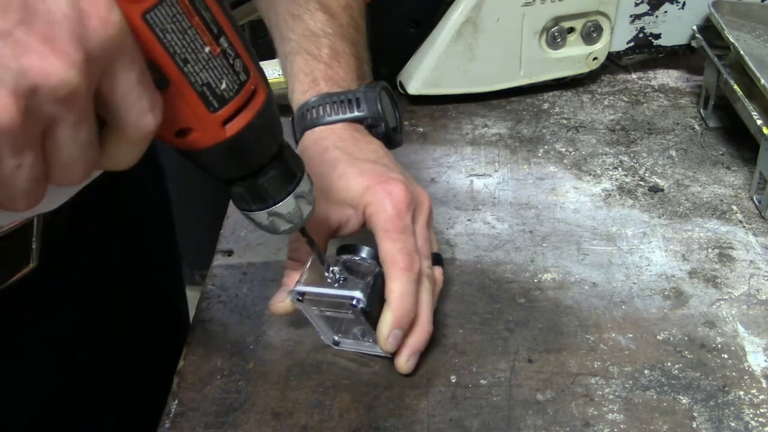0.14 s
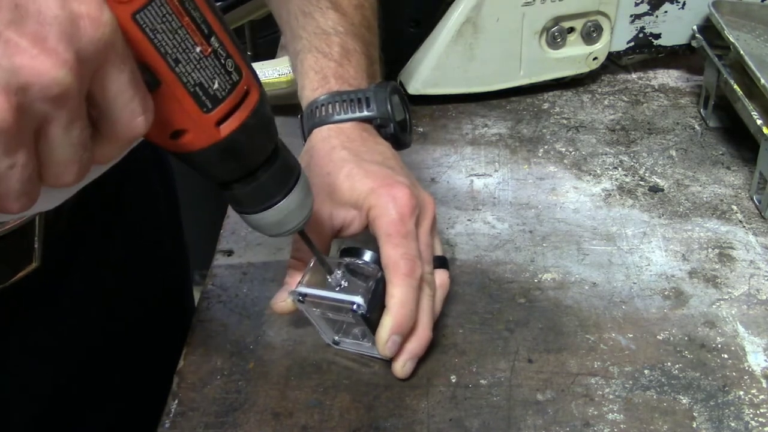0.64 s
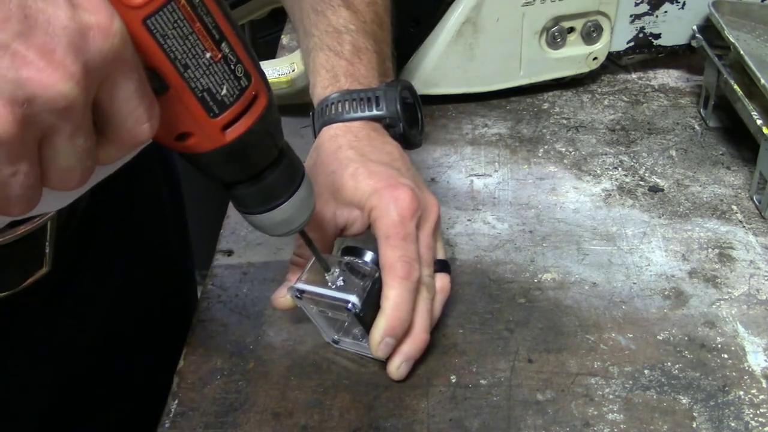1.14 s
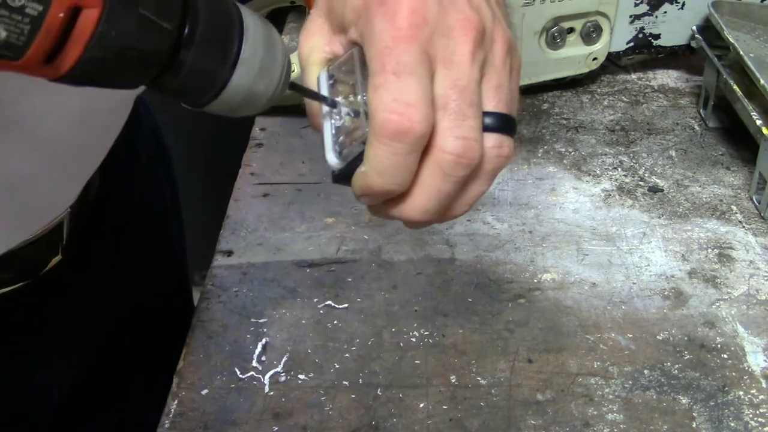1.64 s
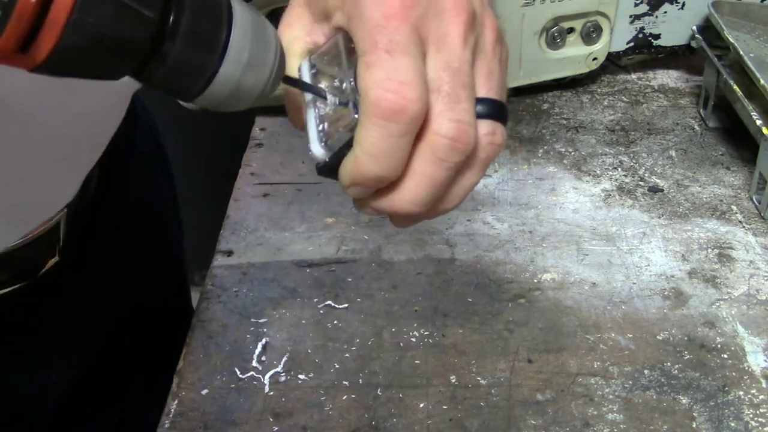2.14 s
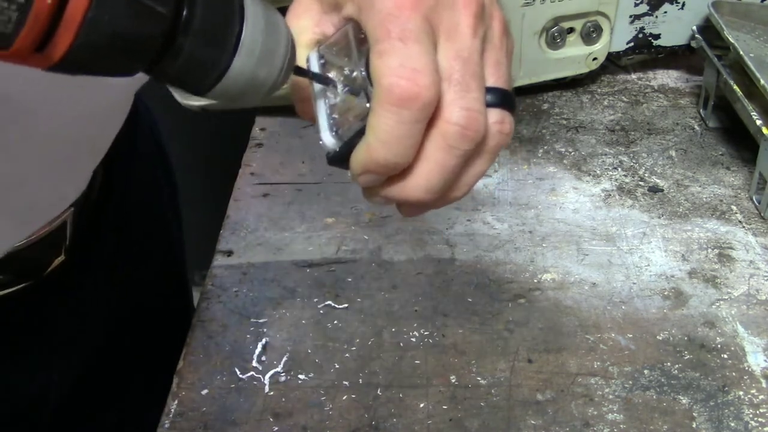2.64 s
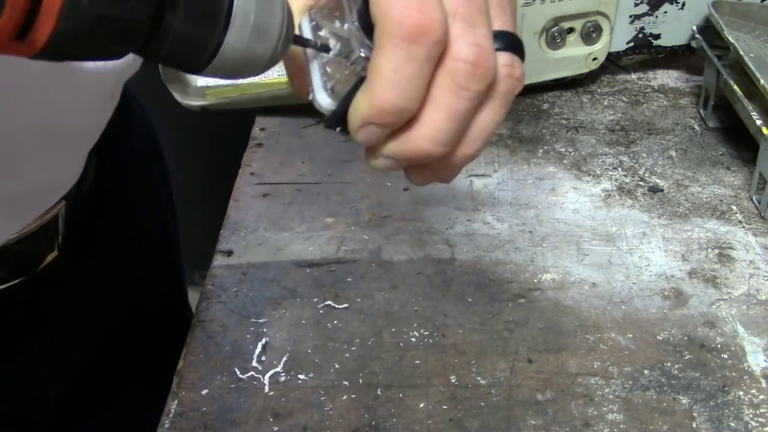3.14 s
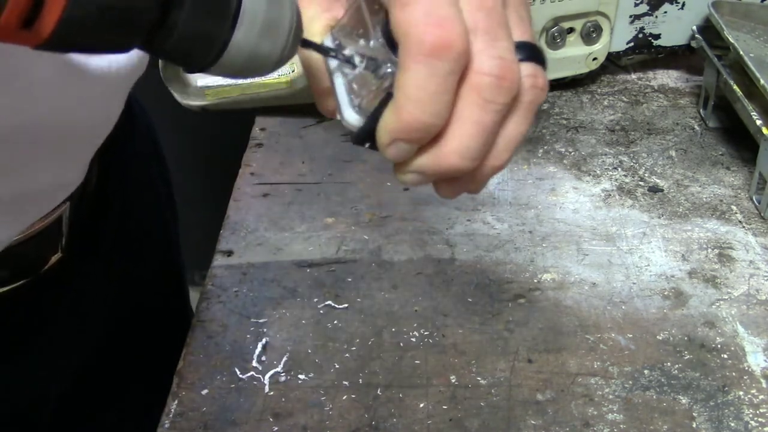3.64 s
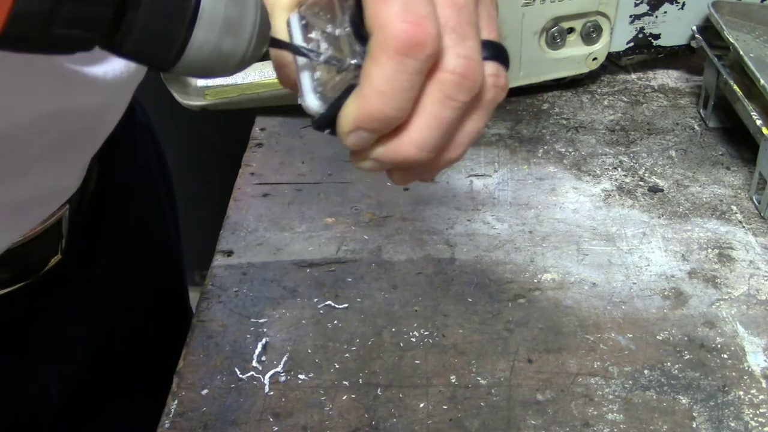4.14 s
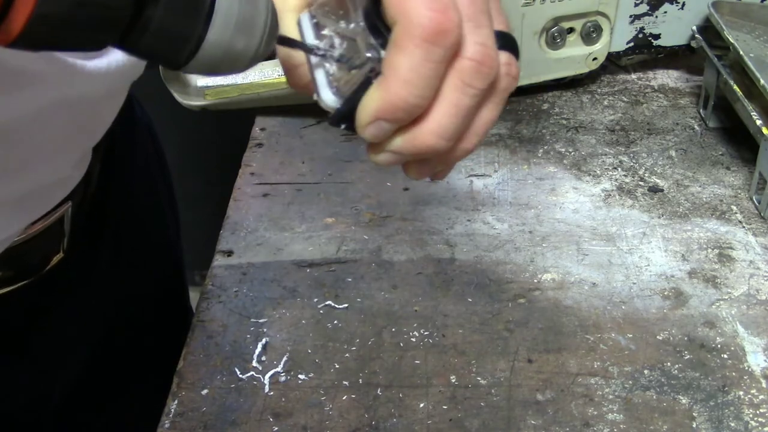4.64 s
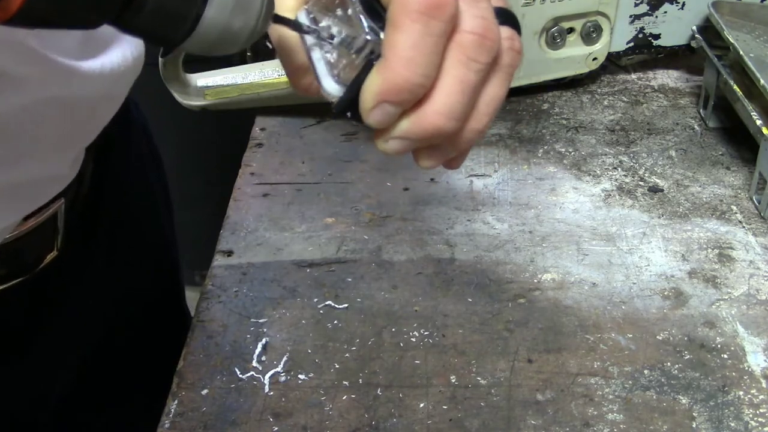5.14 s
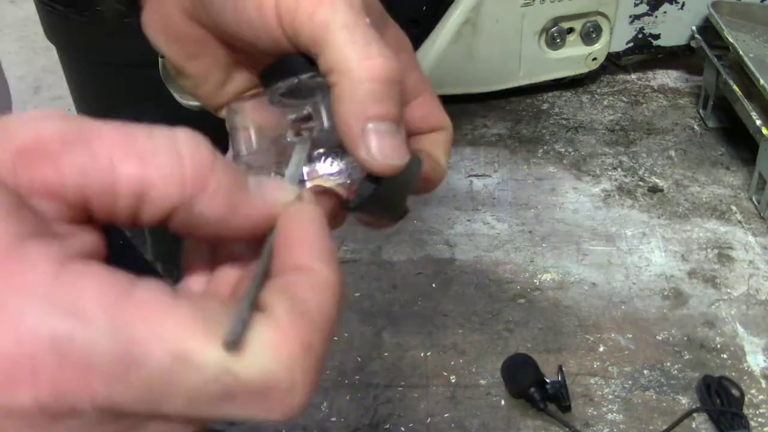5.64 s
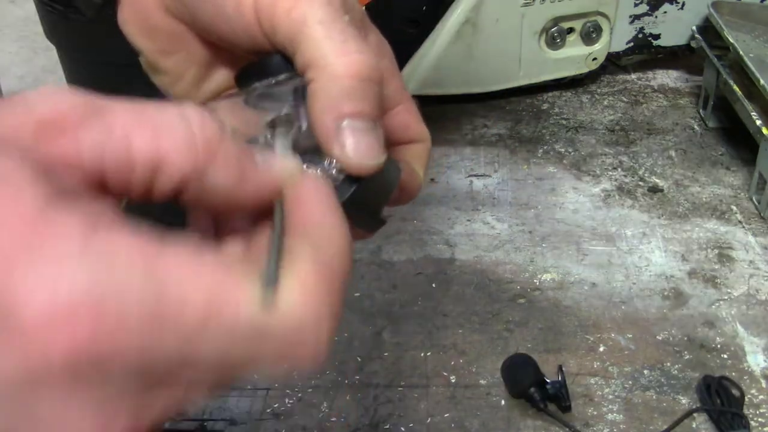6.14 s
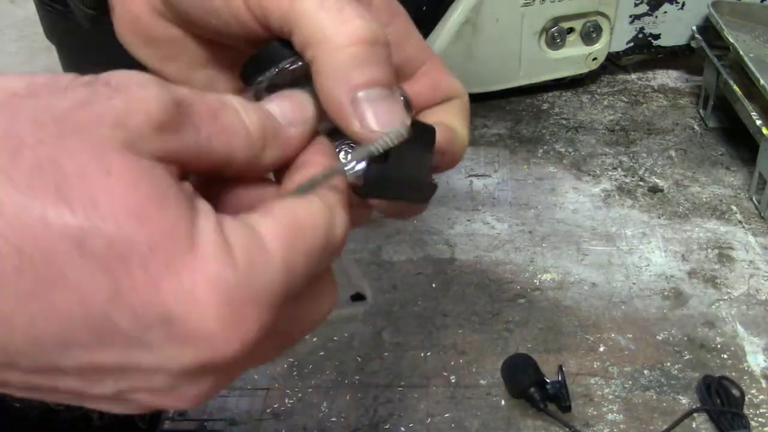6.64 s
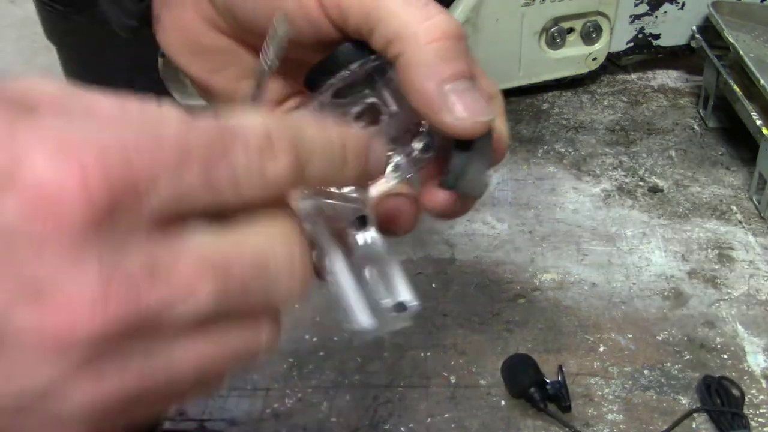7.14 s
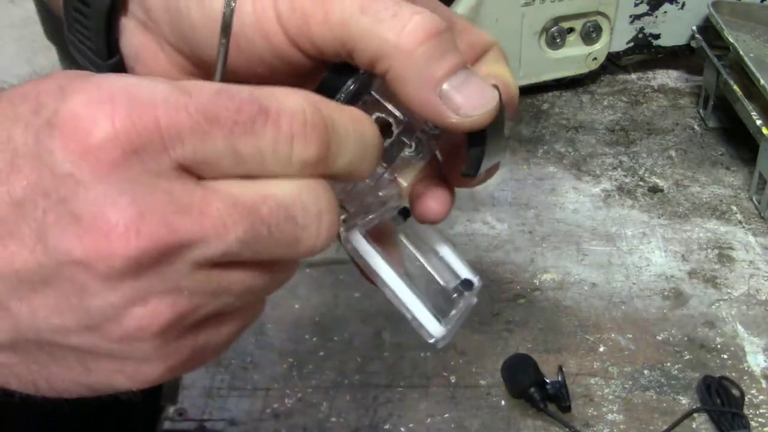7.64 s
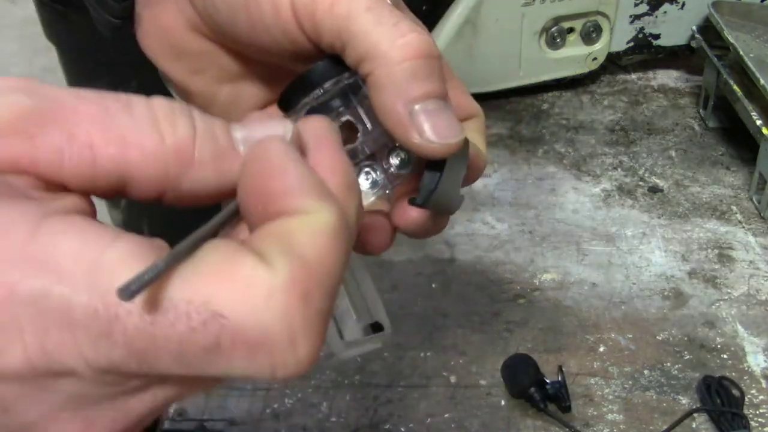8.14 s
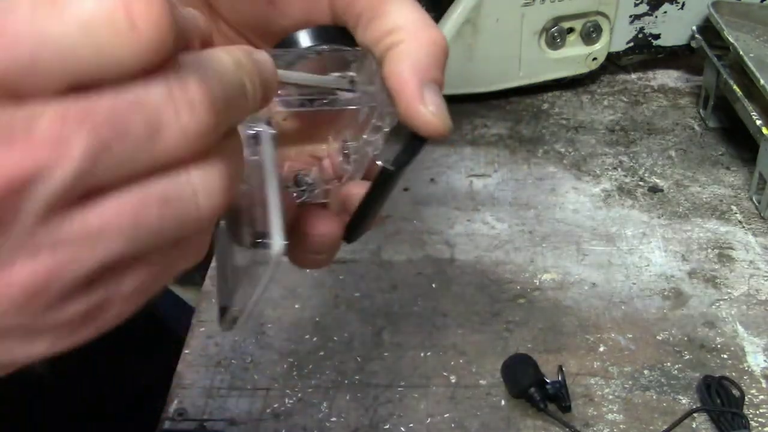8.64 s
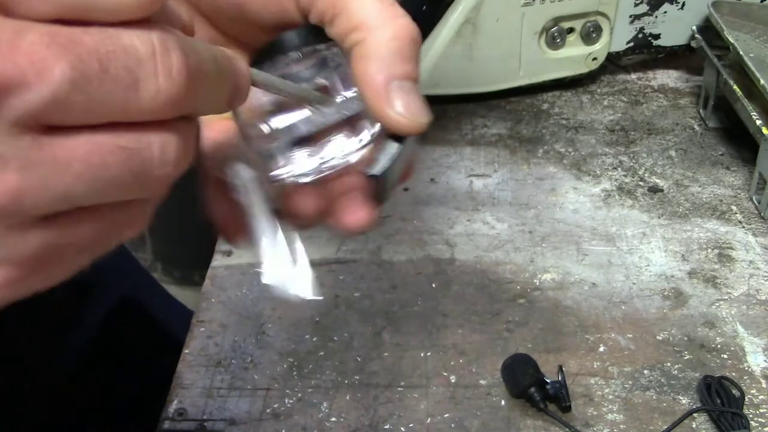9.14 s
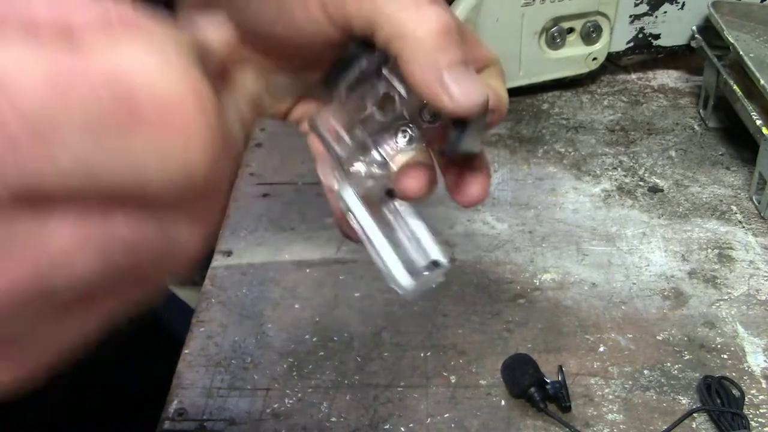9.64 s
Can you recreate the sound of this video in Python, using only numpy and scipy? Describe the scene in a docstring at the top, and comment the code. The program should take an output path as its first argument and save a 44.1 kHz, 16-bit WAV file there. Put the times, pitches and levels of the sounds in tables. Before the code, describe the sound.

Quiet fan rumble, faint mains hum and a dying whir open the scene; a tiny trigger snap comes just before 0.2 s. The drill lurches with a boomy growl and by 0.4 s holds a gear whine near 970 Hz inside a loud, gritty, throbbing roar with chatter, close and slightly left. At 1.34 s a hard cut shifts it to about 840 Hz, wider and more uneven; pitch wavers, the bit binds and chatters, and soft low thuds fall around 2.3-3.3 s. At 5.5 s it cuts off dead. Centred, a file then scrapes a hollow plastic case: clicks and short rasps to 6.2 s with a bright squeak, sparse taps around 6.6-6.9 and 7.2-7.7 s, sharper knocks at 8.1-8.2 s, then increasingly dense strokes from 8.3 s, fullest and hollowest at 9.2-9.5 s, with squeaks, a dull knock and a last tap at 9.7 s. Short concrete-room reverberation.

```python
"""Drilling and filing a plastic case

In a concrete workshop a cordless drill bores a hard plastic case, first on a bench, then up in the hand.
Its gear tones, throbbing noise and chatter come from a little left of centre in the stereo microphones.
After a hard edit a round file rasps, taps and squeaks in the middle: short bursts of noise ring the hollow
case near 1.7 kHz. The room answers the filing some 7 ms later, over fan noise and mains hum."""
import sys
import numpy as np
from scipy import signal
from scipy.fft import rfft, irfft, next_fast_len
from scipy.io import wavfile
from scipy.ndimage import uniform_filter1d, map_coordinates

SR = 44100
rng = np.random.default_rng(int(sys.argv[2]) if len(sys.argv) > 2 else 0)


def transcribe(signal):
    """Save signal, clipped to [-1, 1], as a 16-bit WAV file at the path in sys.argv[1]."""
    frames = np.atleast_2d(signal).T
    limited = np.clip(frames, -1, 1)
    pcm = np.round(limited * 32767).astype(np.int16)
    wavfile.write(sys.argv[1], SR, pcm)


def rack_gain(trim_db):
    """Turn a fader trim in dB into the linear factor to multiply a signal by."""
    fader = np.asarray(trim_db, float)
    return 10 ** (fader / 20)


N = 429975
T = np.arange(N) / SR  # time, s

# spectrum shape of the workshop air: f/Hz, density/dB per Hz
AIR = [(12, -79), (20, -34), (86, -13.5), (116, -5), (204, -14), (248, -9), (377, -12.5), (410, -15),
       (485, -14), (698, -18.5), (949, -21.5), (1120, -20), (16000, -41)]
AIR_DB = -53.5
# side under mid of the air: f/Hz, level/dB
AIR_WIDTH = [(60, -18.5), (400, -9.5), (4000, -8.5), (9000, -15)]
# mean level of each mains hum line: f/Hz, level/dB
HUM = [(120, -62), (238, -67), (480, -63), (598, -68), (958, -66.5), (1200, -70)]
# decay of the workshop's reverberation: f/Hz, t60/s
SHOP = [(500, 0.44), (1600, 0.78), (4000, 0.49), (10000, 0.31)]
# microphone pair, side under mid before each source's own offset: f/Hz, level/dB
WIDTH = [(100, -27), (350, -36), (700, -30), (1500, -26.5), (2400, -22), (3300, -23), (5500, -15),
         (15000, -13.5)]
# microphone pair, left over right for the drill: f/Hz, level/dB
LEAN = [(200, .15), (600, .4), (2400, .5), (15000, 1.1)]

# the case knocks dully against the palm: t/s, f/Hz, level/dB where the decay starts
KNOCKS = [(6.212, 620, -29), (6.686, 775, -25), (9.449, 760, -26), (9.537, 820, -17)]
KNOCK_T60_S = 0.022
# the file skids and squeaks: t/s, length/s, from f/Hz, to f/Hz, level/dB
SQUEAKS = [(6.072, 0.031, 1046, 1080, -30.5), (6.143, 0.015, 2063, 1866, -9.5),
           (6.169, 0.028, 1322, 1450, -25), (8.772, 0.016, 1480, 1340, -32.5),
           (8.847, 0.047, 1050, 1360, -28), (9.032, 0.025, 1655, 1750, -14), (9.074, 0.011, 886, 1050, -25),
           (9.526, 0.017, 4250, 3946, -16.5)]
# cavity resonances before damping: multiple of the cavity note, width/Hz, level/dB (response is squared)
CAVITY = [(.86, 320, -8), (1, 320, 0), (1.13, 320, -8)]
# shell resonances, before the closed hand narrows and mutes them: f/Hz, width/Hz, level/dB
SHELL = [(3880, 450, -1), (5310, 290, 7.5), (6100, 400, -7), (7620, 340, -0.5), (9000, 740, -3.5),
         (11620, 600, -3), (4800, 3700, -7)]
# wall resonances: f/Hz, width/Hz, level/dB
WALL = [(860, 250, -4.5), (1050, 83, 3.5), (1370, 110, 7.5), (2500, 260, -3), (3340, 500, -3.5)]
# fingers cover more or less of the opening and move the cavity note: t/s, f/Hz
OPENING = [(5.66, 1810), (6.2, 1875), (6.65, 1610), (6.8, 1740), (7.4, 1750), (7.65, 1676), (8.08, 1800),
           (8.2, 1700), (8.5, 1697), (9.72, 1706)]
NOTE_SCATTER = .008  # share by which each touch scatters the cavity note
# taps and snags of the file: t/s, cavity ring energy/dB, rasp over cavity/dB
TAPS = [(5.664, -18, -16.5), (5.84, -23, -7), (5.851, -8.5, -2.5), (5.9073, -20, -7), (5.9174, -5, -19),
        (5.9579, -27, -3), (6.156, 13.5, -16), (6.59, -23, -9), (6.6847, -14.5, -4), (6.796, -20, -12.5),
        (6.806, -7, -6), (6.863, -15, -21), (7.211, -16, -12.5), (7.419, -16, -11), (7.545, -30, -14),
        (7.614, -31, -12), (7.6464, -0.5, -4), (7.654, -2.5, -3), (7.67, -9, -10), (8.078, -2, -9.5),
        (8.0945, -9, -17), (8.101, 10.5, -13.5), (8.122, -4, -18), (8.1427, -19, -17), (8.194, 12, -22),
        (8.404, 3, -1.5), (8.4486, 2.5, -22), (8.819, 8.5, -6), (8.936, 13.5, -10), (9.1132, -3, -8),
        (9.3583, 5, -15), (9.405, 8, -10), (9.517, 0, -7), (9.538, 4.5, -8.5), (9.716, -7.5, -0.5)]
TAP_WALL_DB = -9.5  # walls over the cavity in a tap
# file strokes: t/s, length/s, swell from start to end/dB, cavity level/dB, rasp level/dB
STROKES = [(5.859, 0.0052, -6, -39, -39), (5.979, 0.077, 9, -27.5, -28), (6.067, 0.054, 1.5, -26.5, -31),
           (6.124, 0.024, 0, -25.5, -24.5), (6.171, 0.044, 13, -21, -21), (6.602, .022, 3, -50, -56),
           (6.628, 0.012, 0, -42, -43.5), (6.653, .016, 0, -54, -53), (6.677, 0.013, 3, -48, -36.5),
           (7.32, 0.021, -3, -37, -46.5), (7.647, 0.034, -25, -22.5, -39), (8.188, 0.0207, 6.5, -21, -31.5),
           (8.209, 0.021, -17, -23, -28.5), (8.327, 0.032, -14, -30, -34.5), (8.391, 0.038, -1, -26, -28),
           (8.453, 0.023, -22, -34, -31.5), (8.514, 0.022, 10, -39, -38), (8.659, 0.045, -5, -32, -24),
           (8.744, 0.045, -15, -32.5, -33.5), (8.797, 0.019, 11, -24, -21.5), (8.855, 0.026, 5, -30, -29.5),
           (8.899, 0.042, 3, -23.5, -24.5), (8.961, 0.04, -5.5, -29.5, -31),
           (9.015, 0.032, 0.5, -21, -23.5), (9.066, 0.038, -4, -26, -32.5), (9.12, 0.032, 14, -23.5, -29.5),
           (9.162, 0.029, -1, -37, -42), (9.207, 0.035, -2, -21, -22.5), (9.254, 0.051, 3, -13, -23),
           (9.301, 0.054, -7, -14.5, -18), (9.357, 0.034, -9, -11, -24.5), (9.391, 0.043, -12, -12, -21),
           (9.436, 0.044, -2, -24.5, -32), (9.481, 0.023, 0, -16, -21.5), (9.51, 0.033, -5.5, -16, -19.5),
           (9.528, 0.014, 5.5, -47, -23.5)]
# from CLASP_S on the hand closes on the case during strokes; walls over the rasp before and after
CLASP_S, LOOSE_DB, CLASPED_DB = 9.11, -1.5, -15.5
CLASPED_WIDTH = .85  # factor on shell widths in the closed hand
CLASPED_DULL_DB, DULL_HZ = -6, 6800  # the hand mutes shell modes that reach above DULL_HZ

# motor speed under load, one list per run: t/s, gear-mesh f/Hz, mean mesh tone peak level/dB
RUNS = [
    [(.19, 352.6, -39), (.285, 543, -13), (.294, 650, -17), (.303, 760, -12.5), (.322, 815, -12),
     (.34, 921.5, -21), (.365, 955.4, -21.5), (.41, 975, -21.5), (.9, 976, -20.5), (1.338, 968.4, -23)],
    [(1.342, 831.5, -21.5), (1.6, 838, -23.5), (2.08, 851, -24), (2.2, 836, -25.5), (2.5, 847.5, -25.5),
     (2.75, 860, -23.5), (2.88, 866, -20), (3.18, 886, -20), (3.4, 880.5, -23), (3.53, 856.4, -27.5),
     (3.65, 851, -20.5), (4.02, 862, -20), (4.22, 867.5, -20), (4.48, 826, -20.5), (4.75, 833, -21.5),
     (5.02, 833, -25.5), (5.13, 852.6, -21), (5.3, 850, -21.5), (5.523, 861, -21.5)],
]
# starts of the three grips, first on the bench, then two in the hand: t/s
GRIPS = [0, 1.34, 2.75]
# spectrum shape of the roar, one list per grip: f/Hz, density/dB per Hz
ROAR = [
    [(71, -59), (120, -9.5), (209, -24.5), (321, -4), (513, -17), (911, -9.5), (988, -4), (1430, -10.5),
     (3820, -11), (4230, -12), (8660, -17.5), (11500, -23), (16000, -38)],
    [(71, -75.5), (120, -26.5), (301, -2.5), (348, 3), (418, -4), (839, -4.5), (949, -5), (2340, -5),
     (2700, -7.5), (5630, -14), (11500, -15), (14700, -31.5), (16000, -59.5)],
    [(71, -57.5), (120, -46.5), (196, -23), (341, -5.5), (445, -13), (839, -6.5), (2430, -13),
     (5630, -10.5), (7200, -17.5), (9210, -12), (13300, -27.5), (14700, -34.5), (16000, -85)],
]
# mean roar level from 1.5 to 11 kHz, one per grip: level/dB
ROAR_DB = [-16, -16.5, -16.5]
# resonances of housing and case, one list per grip: f/Hz, width/Hz, boost/dB
HOUSING = [
    [(362, 57, 5), (650, 150, 12), (804, 81, 8.5), (2380, 110, 5), (3150, 180, 3.5), (3690, 340, 9.5),
     (4850, 340, 5), (5490, 390, 4), (8800, 940, 6.5), (9830, 280, 6.5), (11180, 330, 10),
     (13170, 130, 10.5)],
    [(355.9, 240, -7), (1480, 56, 7), (1840, 110, 3), (2324, 110, 3.5), (2675, 99, -13), (3390, 72, -1.5),
     (3790, 100, 4), (4690, 1100, 8.5), (5740, 760, 9), (8300, 160, 5), (11454, 310, -1)],
    [(332, 140, -2.5), (578, 120, 3), (1450, 66, 7.5), (2085, 280, 4), (3016, 220, 9), (3433, 110, 6),
     (3750, 130, 6.5), (4500, 180, 6.5), (5590, 180, 6), (6700, 100, 5.5), (7860, 250, 5), (10140, 180, -9)],
]
# the bit chattering in the hole, one row per grip: f/Hz, width/Hz
CHATTER = [(1238, 97), (1212, 180), (1150, 265)]
# mean level of the steady chatter, one per grip: level/dB
CHATTER_DB = [-28.5, -30, -28.5]
# the bit binds and its chatter rises or sinks for a moment: t/s, half length/s, boost/dB
BINDS = [(1.364, 0.13, 2.5), (2.097, 0.08, 0), (2.921, 0.081, 5.5), (3.23, .1, 7.5), (3.971, 0.033, 12),
         (4.199, 0.16, 7), (4.5, 0.094, 4), (5.146, 0.062, -5)]
# tones of the gear train: multiples of the mesh f
MULTIPLES = [1 / 3, 5 / 12, 2 / 3, 5 / 6, 4 / 3, 2, 5 / 2, 3, 4, 5]
# their peak level against the roar before a common lift, one list per grip in the order above: level/dB
ORDERS_DB = [
    [-25.5, -25, -21, -25.5, -19, -19.5, -41, -19, -13, -22.5],
    [-29, -14, -19, -18, -21.5, -21, -18, -19.5, -30, -25.5],
    [-26, -21, -24.5, -21.5, -45.5, -23, -19, -24.5, -31, -18.5],
]
# phase tremble of those tones on the bench and in the hand, before it grows with the multiple: angle/rad
ROUGH_RAD = [.3, .13]
# the tone at three times the mesh f swells or sinks: t/s, half length/s, boost/dB
THIRD_SWELLS = [(.45, 0.075, -2.5), (.85, 0.29, 5.5), (1.527, 0.24, 10.5), (2.12, 0.085, 10),
                (2.54, 0.05, 9), (2.77, 0.043, 3)]
# the tone at four times the mesh f swells: t/s, half length/s, boost/dB
FOURTH_SWELLS = [(1.624, 0.097, 12), (1.932, .08, 17), (2.747, 0.19, 9.5), (3.2, .15, 7.5), (4.12, .1, 4.5)]
# bands of the roar swell or sink: t/s, half length/s, f/Hz, width/octaves, boost/dB
BAND_SWELLS = [(2.6, 0.27, 3250, 0.25, 1), (3.123, 0.16, 3340, .2, 1.5), (3.456, .05, 2400, 0.31, -10),
               (3.566, .12, 3527, 0.28, -5.5), (4.2, 0.33, 5100, 0.076, 0.5), (4.594, 0.082, 3920, .08, -2),
               (0.598, .2, 4800, 0.056, 4)]
RIPPLE_HZ = 43.07  # mean rate of a level ripple laid over the noise, independent of the drill's speed
# that level ripple, one per grip: depth/dB
RIPPLE_DB = [1.5, 1.2, 1.2]
# drift of the roar's colour, one per grip: rms/dB
PATCHY_DB = [.5, .9, 1.1]
RATTLE_DB = 1.43  # rms; chips rattle single resonances for a few milliseconds
# the roar starts SPIN_DB down and from SPIN_S closes the gap with this time constant
SPIN_DB, SPIN_S, SPIN_TAU_S = 28.5, 0.23, 0.032
# the bit catches and jolts the case: t/s, level/dB where the decay starts
JOLTS = [(2.322, -36.5), (2.641, -27.5), (2.753, -30), (3.304, -35)]
# a finger brushes the trigger, then snaps it: t/s, noise level/dB at the start, before darkening
TRIGGER = [(.142, -49.5), (0.185, -24.5)]
# the motor lurches out of rest: t/s, noise level/dB at the start, before the housing
LURCHES = [(0.204, -10.5), (0.234, -7), (0.255, -4), (0.283, -7)]
TOP_HZ = 15600  # upper band limit of the sound


def unit(x):
    """Scaled to rms 1."""
    return x / np.sqrt(np.mean(x ** 2) + 1e-20)


def along(points, hz):
    """Interpolates (f/Hz, value) points on a log frequency axis."""
    f, v = np.transpose(points)
    return np.interp(np.log(hz + 1), np.log(f + 1), v)


def wobble(rate):
    """A smooth random curve with rate knots a second."""
    coarse = T[::8]
    knots = rng.standard_normal(int(N * rate / SR) + 4)
    return np.interp(T, coarse, map_coordinates(knots, [coarse * rate]))


def hump(s, half_s, db):
    """A smooth rise and fall in dB around s."""
    return db * np.exp(-((T - s) / half_s) ** 2)


def filtered(x, response):
    """Multiplies the spectrum of x by a complex response of frequency."""
    m = next_fast_len(N + 8192)
    return irfft(rfft(x, m) * response(np.fft.rfftfreq(m, 1 / SR)), m)[..., :N]


def modes(table):
    """Causal response of a set of resonances (f/Hz, width/Hz, level/dB) of alternating sign."""
    def response(f):
        return sum((-1) ** k * rack_gain(db) * 1j * f * w / (c * c - f * f + 1j * f * w)
                   for k, (c, w, db) in enumerate(table))
    return response


def bell(f, c, w):
    """A resonance peak of height 1 at c, half as high at the edges of its width w."""
    return 1 / (1 + (2 * (f - c) / w) ** 2)


def in_band(x, lo_hz, hi_hz):
    """Scaled so that the band from lo_hz to hi_hz has rms 1."""
    return x / np.std(filtered(x, lambda f: (f > lo_hz) & (f < hi_hz)))


def patchy(x, patchy_db, size):
    """Drifting colour: random gain in patches of time and frequency."""
    z = signal.stft(x, nperseg=size)[2]
    field = uniform_filter1d(rng.standard_normal(z.shape), size=1 + size // 120, axis=0)
    field = uniform_filter1d(field, size=2 + size // 80, axis=1)
    return signal.istft(z * rack_gain(patchy_db * unit(field)), nperseg=size)[1][:N]


def air():
    """Distant fans as shaped noise, hum as sines, and two noises already dying away at 0 and 5.525 s."""
    mid, side = filtered(rng.standard_normal((2, N)), lambda f: rack_gain(along(AIR, f)))
    side = filtered(unit(side), lambda f: rack_gain(along(AIR_WIDTH, f)))
    hiss = unit(mid) + np.outer([1, -1], side)
    hum = sum(rack_gain(db + 2.5 * wobble(12)) * np.sin(2 * np.pi * hz * T + .3 * wobble(15)) for hz, db in HUM)
    whir = filtered(rng.standard_normal(N), lambda f: rack_gain(along(ROAR[0], f)) / (1 + (f / 2400) ** 2))
    whir = rack_gain(-41.0 - 60 * T / 0.95) * unit(whir)
    ring = unit(filtered(rng.standard_normal(N), modes([(1750, 92, 0)])))
    ring *= rack_gain(-49 - 60 * np.abs(T - 5.525) / .6) * (T > 5.525)
    nearer_db = -4.5 * (T > 1.34) * (T < 5.525)  # air and hum are fainter while the drill is in the hand
    return rack_gain(AIR_DB + nearer_db) * hiss + rack_gain(nearer_db) * hum + whir + ring


def shop(x):
    """The room's answer: noise tails in which each frequency dies at its own speed."""
    hz, t, z = signal.stft(rng.standard_normal((2, SR * 3 // 4)), SR, nperseg=256)
    tail = signal.istft(z * rack_gain(-60 * t / along(SHOP, hz)[:, None]), SR, nperseg=256)[1]
    tail = np.array([tail[0] + 0.14 * tail[1], tail[0] - 0.11 * tail[1]])
    late = np.pad(x, (300, 0))[None]  # 300 samples, about 7 ms
    return signal.fftconvolve(late, tail / np.linalg.norm(tail[0]), axes=1)[:, :N]


def spread(x, side_db):
    """The two microphones hear shifting reflections: a weak side signal of wandering phase."""
    drift = 3 * wobble(60)
    quadrature = filtered(x, lambda f: -1j + 0 * f)
    side = x * np.cos(drift) + quadrature * np.sin(drift)
    side = rack_gain(side_db) * filtered(side, lambda f: rack_gain(along(WIDTH, f)))
    return np.array([x + side, x - side])


def knocks():
    """Case against palm: a low sine with a soft onset that dies at once."""
    out, t = np.zeros(N), np.arange(SR // 10) / SR
    for s, hz, db in KNOCKS:
        envelope = rack_gain(db - 60 * t / KNOCK_T60_S) * (1 - np.exp(-t / 0.0018))
        out[round(s * SR):][:len(t)] += envelope * np.sin(2 * np.pi * hz * t)
    return out


def squeaks():
    """Short runs of regular slips: a gliding, jittering note with overtones."""
    out = np.zeros(N)
    for s, length, from_hz, to_hz, db in SQUEAKS:
        u = np.linspace(0, 1, round(length * SR))
        hz = (from_hz + (to_hz - from_hz) * u) * (1 + 0.17 * rng.standard_normal(len(u)))
        turn = 2 * np.pi * np.cumsum(hz) / SR
        note = np.sin(turn) + 0.23 * np.sin(2 * turn) + 0.22 * np.sin(3 * turn)
        out[round(s * SR):][:len(u)] += rack_gain(db) * np.sqrt(2) * np.sin(np.pi * u) * note
    return out


def case(push, s, cavity_db, rasp_db, wall_db, damping=1, clasped=False):
    """One contact, noise under the push, rings cavity, shell and walls; every touch favours other modes."""
    note_hz = np.interp(s, *np.transpose(OPENING)) * (1 + NOTE_SCATTER * rng.standard_normal())
    size = next_fast_len(len(push) + 1500)
    f, out = np.fft.rfftfreq(size, 1 / SR), np.zeros(size)
    cavity = [(m * note_hz, damping * w, g) for m, w, g in CAVITY]
    shell = SHELL
    if clasped:
        shell = [(c, CLASPED_WIDTH * w, g + CLASPED_DULL_DB * (c + w > DULL_HZ)) for c, w, g in SHELL]
    soft = (1j * f / (650 + 1j * f)) ** 3  # the small case radiates no bass
    # table, level/dB, power of the response (2 gives the cavity steep skirts), scatter of its modes/dB
    parts = [(cavity, cavity_db, 2, 1), (shell, rasp_db, 1, 2), (WALL, wall_db, 1, 2.5)]
    for table, db, order, scatter_db in parts:
        touch = rng.standard_normal((len(table), 2))
        table = [(c * (1 + 0.019 * a), w, g + scatter_db * b) for (c, w, g), (a, b) in zip(table, touch)]
        noise = rfft(push * rng.standard_normal(len(push)), size)
        ring = irfft(noise * modes(table)(f) ** order * soft, size)
        out += rack_gain(db) * ring / np.linalg.norm(ring)
    return out


def taps():
    """Each contact is a few milliseconds of scratch into the case, its cavity damped by the fingers."""
    out, t = np.zeros(N + SR), np.arange(SR // 50) / SR
    scratch = rack_gain(-60 * t / 0.017) * (1 - np.exp(-t / .0003))
    for s, db, bright_db in TAPS:
        ring = case(scratch, s, db, db + bright_db, db + TAP_WALL_DB, damping=2.24)
        out[round(s * SR):][:len(ring)] += ring
    return out[:N]


def file_strokes():
    """File teeth catch unevenly along the arch of each stroke and ring the case."""
    out, teeth = np.zeros(N + SR), rack_gain(2.2 * wobble(130) + 3.8 * wobble(900))
    for s, length, swell_db, cavity_db, rasp_db in STROKES:
        i = np.arange(round((s - .003) * SR), round((s + length + 0.0038) * SR))
        arch = np.sin(np.pi * (i - i[0]) / len(i)) ** 0.72
        arch *= rack_gain(swell_db * ((T[i] - s) / length - .5))
        clasped = s > CLASP_S
        wall_db = rasp_db + (CLASPED_DB if clasped else LOOSE_DB)
        damping = 1 if clasped else 1.5
        ring = case(arch * teeth[i], s, cavity_db, rasp_db, wall_db, damping=damping, clasped=clasped)
        out[i[0]:][:len(ring)] += np.sqrt(length * SR) * ring  # from energy to level over the stroke
    return out[:N]


def trigger():
    """Dry snaps of the switch: short bursts of darkened noise."""
    out, t = np.zeros(N), np.arange(SR // 8) / SR
    for s, db in TRIGGER:
        snap = signal.lfilter([1], [1, -.65], rng.standard_normal(len(t)))
        out[round(s * SR):][:len(t)] += rack_gain(db - 60 * t / 0.044) * snap
    return out


def lurches():
    """The housing booms as the motor lurches: decaying noise through two resonances."""
    kicks, t = np.zeros(N), np.arange(SR // 8) / SR
    for s, db in LURCHES:
        kicks[round(s * SR):][:len(t)] += rack_gain(db - 60 * t / 0.2) * rng.standard_normal(len(t))
    return filtered(kicks, modes([(650, 450, 0), (1186, 630, 0.0056)]))


def jolts():
    """The bit catches and the case thuds: a decaying 195 Hz sine with a soft onset."""
    out, t = np.zeros(N), np.arange(SR // 8) / SR
    thud = (1 - np.exp(-t / 0.0045)) * np.sin(2 * np.pi * 195 * t)
    for s, db in JOLTS:
        out[round(s * SR):][:len(t)] += rack_gain(db - 60 * t / 0.13) * thud
    return out


def bit_chatter(k):
    """The bit in the hole: noise in one narrow band, which bites once the bit turns."""
    chatter = unit(filtered(rng.standard_normal(N), lambda f: bell(f, *CHATTER[k])))
    return chatter * np.clip((T - .25) / .1, 0, 1)


def roar_of_grip(k, chips, throb, presence):
    """Breaking chips: noise that throbs with the teeth, coloured by the grip, under a laid-on level ripple."""
    ripple_db = RIPPLE_DB[k] * np.cos(2 * np.pi * RIPPLE_HZ * T + wobble(5))
    uneven_db = 0.52 * wobble(40) + 0.77 * wobble(400)
    grit = patchy(np.roll(chips, k * SR), PATCHY_DB[k], size=1024) * throb * rack_gain(ripple_db + uneven_db)

    def colour(f):
        boost_db = sum(db * bell(f, c, w) for c, w, db in HOUSING[k])
        return rack_gain(along(ROAR[k], f) + boost_db) / (1 + (215 / (f + 1)) ** 4)

    roar = in_band(filtered(grit, colour), 1500, 11000)
    for s, half_s, hz, octaves, db in BAND_SWELLS:
        if presence[round(s * SR)] > .5:  # the swell falls in this grip
            band = filtered(roar, lambda f: np.exp(-(np.log2((f + 1) / hz) / octaves) ** 2))
            roar = roar + (rack_gain(hump(s, half_s, db)) - 1) * band
    return roar


def gear_lines(turn):
    """Gear-train tones locked to the mesh phase, each trembling in level and phase."""
    rough = np.where(T < GRIPS[1], *ROUGH_RAD)
    lines = []
    for m in MULTIPLES:
        phase = m * turn + rough * np.sqrt(1 + m * m) * wobble(70)
        lines.append(rack_gain(2.4 * wobble(11) + wobble(3.37)) * np.sin(phase))
    lines = np.array(lines)
    lines[MULTIPLES.index(3)] *= rack_gain(sum(hump(*swell) for swell in THIRD_SWELLS))
    lines[MULTIPLES.index(4)] *= rack_gain(sum(hump(*swell) for swell in FOURTH_SWELLS))
    return lines


def drill():
    """A gear whine, its related tones and chatter over a roar that throbs with the teeth."""
    start_s, *columns = np.transpose(RUNS[0] + RUNS[1])
    mesh_hz, tone_db = [np.interp(T, start_s, c) for c in columns]
    effort_db = 0.38 * wobble(5.2) - SPIN_DB * np.exp(-np.maximum(T - SPIN_S, 0) / SPIN_TAU_S)
    bind_db = 1.5 * wobble(8.7) + sum(hump(*b) for b in BINDS)
    turn = 2 * np.pi * np.cumsum(mesh_hz * (1 + 0.00307 * wobble(25))) / SR
    # tooth contacts and the rotor's turn
    throb = 1 + .08 * np.cos(turn) + .06 * np.cos(turn / 3) + .1 * np.cos(turn / 6)
    out = rack_gain(tone_db + 0.99 * wobble(16) + 0.88 * wobble(50)) * np.sin(turn + .35 * wobble(60))
    out *= np.clip((T - .262) / .02, 0, 1)  # the whine breaks out as the teeth engage
    seated = np.clip((T - .33) / 0.063, 0, 1)  # the other tones come once the gears carry load
    fades = [np.clip((T - s) / fade_s, 0, 1) for s, fade_s in zip(GRIPS, [.001, .004, .15])] + [0]
    chips = patchy(rng.standard_normal(N), RATTLE_DB, size=128)
    lines = gear_lines(turn)
    for k, orders_db in enumerate(ORDERS_DB):
        presence = fades[k] - fades[k + 1]
        tones = rack_gain(orders_db) @ lines
        roar = roar_of_grip(k, chips, throb, presence)
        held = rack_gain(ROAR_DB[k] + effort_db) * (roar + 1.58 * seated * tones)
        held += rack_gain(CHATTER_DB[k] + bind_db) * bit_chatter(k)
        out += held * np.sqrt(np.clip(presence, 0, 1))
    # soft start, then a hard edit at the end
    out *= np.clip((T - start_s[0]) / .02, 0, 1) * np.clip((5.525 - T) / .003, 0, 1)
    return out + jolts() + lurches() + trigger()


def scene():
    """Drill a little to the left, file work in the middle, room and air around."""
    lean = lambda f: rack_gain(along(LEAN, f) * np.array([[.5], [-.5]]))
    filing = file_strokes() + taps() + squeaks() + knocks()
    drill_side_db = np.where(T < 1.34, -4.5, -.5)  # wider in the hand than on the bench
    drilling = filtered(spread(drill(), drill_side_db), lean)
    return drilling + spread(filing, -4.5) + rack_gain(-18.5) * shop(filing) + air()


def low_pass(x):
    """Removes everything above the highest recorded frequency."""
    return signal.sosfilt(signal.butter(12, 16530, fs=SR, output="sos"), x)


def record(dry):
    """The microphone signal: the loudest peaks clip softly, and a steep filter ends the treble."""
    top, hard = .97, 6
    clipped = dry / (1 + np.abs(dry / top) ** hard) ** (1 / hard)
    heard = filtered(clipped, lambda f: 1 / (1 + (f / TOP_HZ) ** 80))
    return low_pass(heard)


dry = scene()
out = record(dry)
transcribe(out)
```